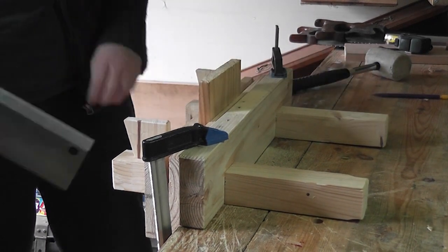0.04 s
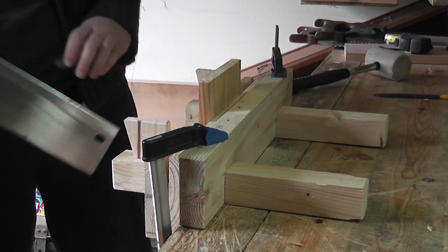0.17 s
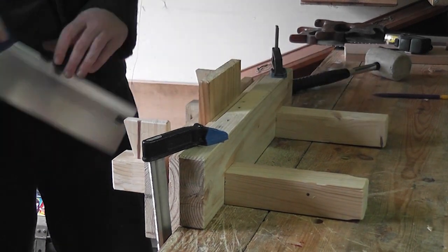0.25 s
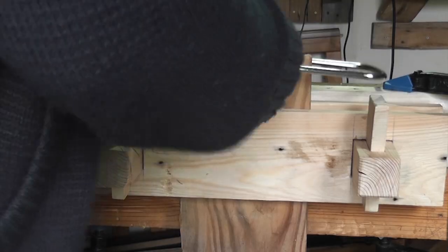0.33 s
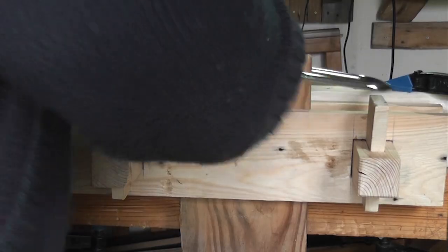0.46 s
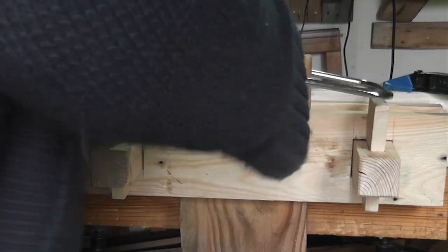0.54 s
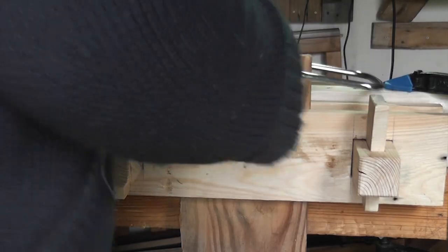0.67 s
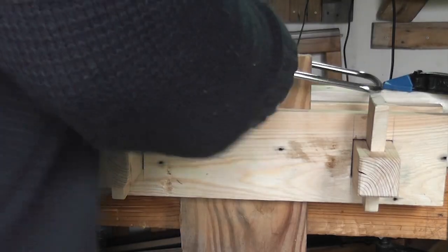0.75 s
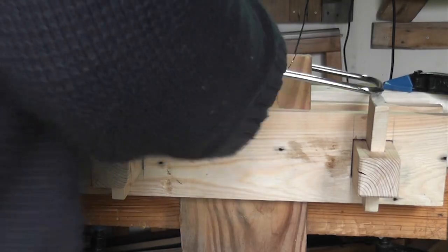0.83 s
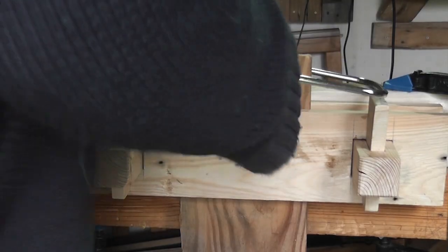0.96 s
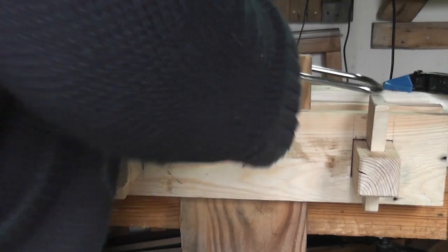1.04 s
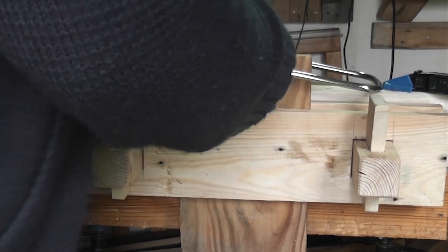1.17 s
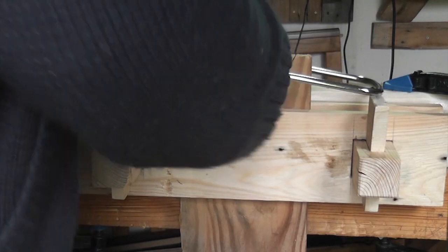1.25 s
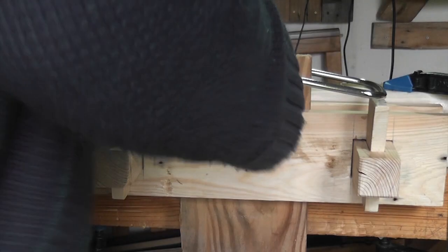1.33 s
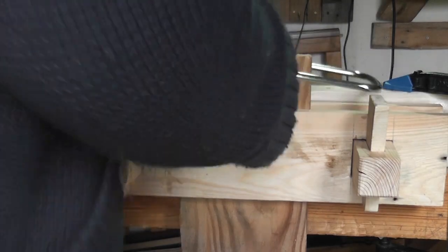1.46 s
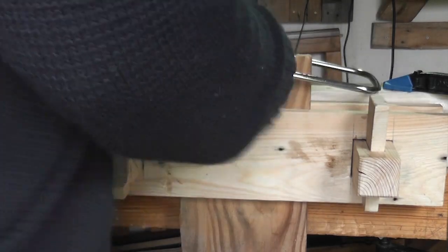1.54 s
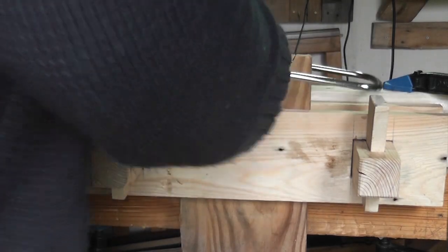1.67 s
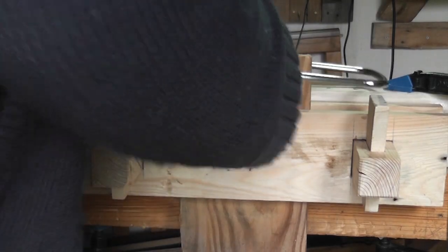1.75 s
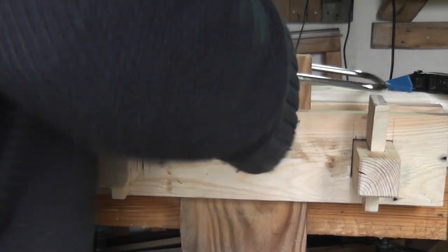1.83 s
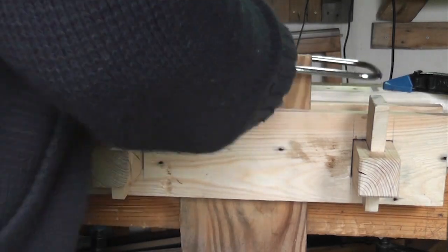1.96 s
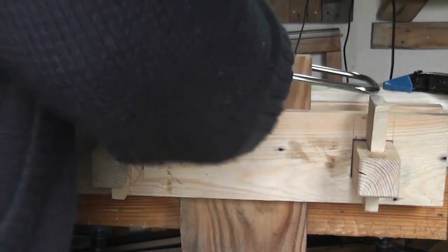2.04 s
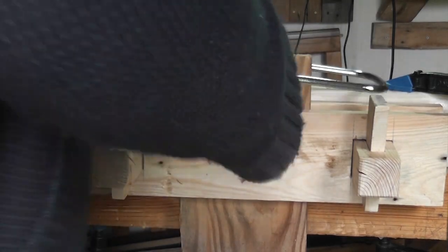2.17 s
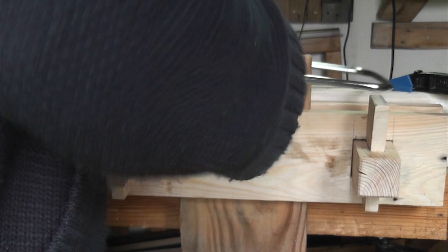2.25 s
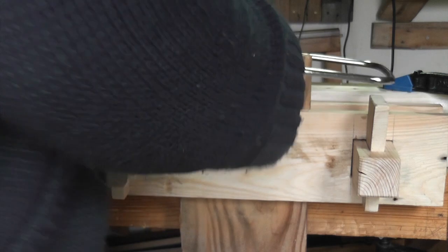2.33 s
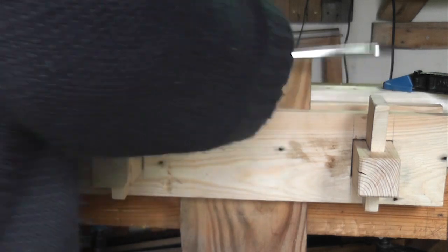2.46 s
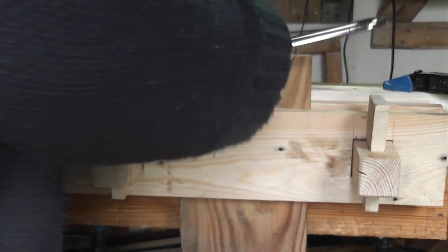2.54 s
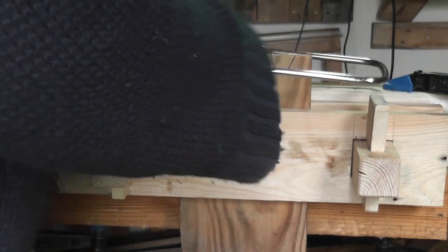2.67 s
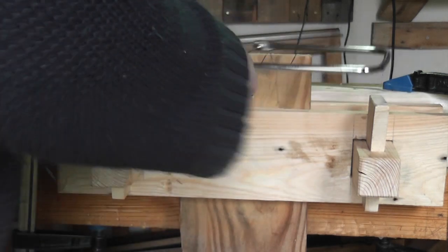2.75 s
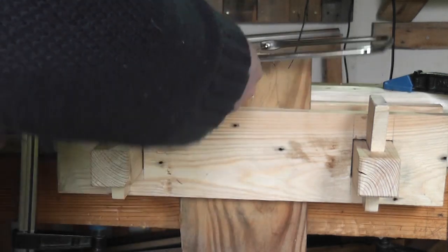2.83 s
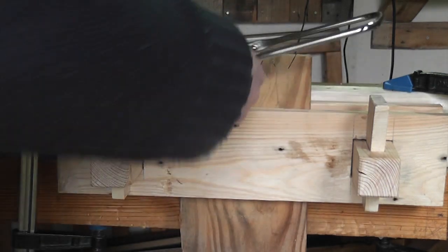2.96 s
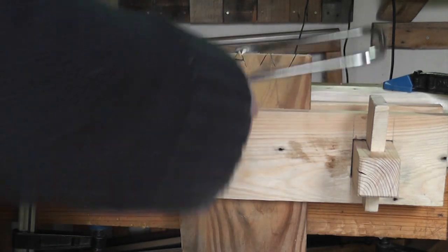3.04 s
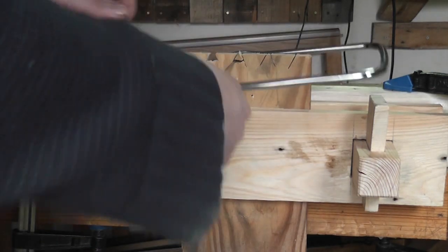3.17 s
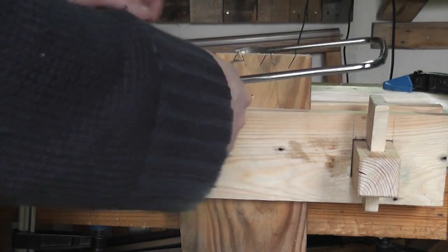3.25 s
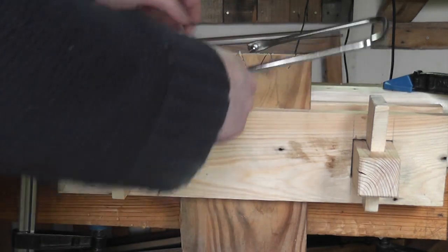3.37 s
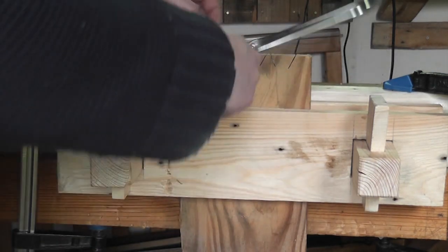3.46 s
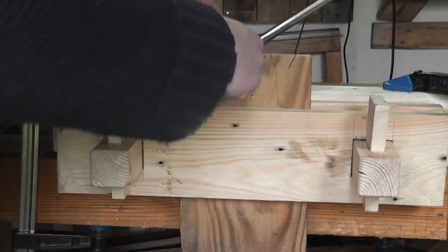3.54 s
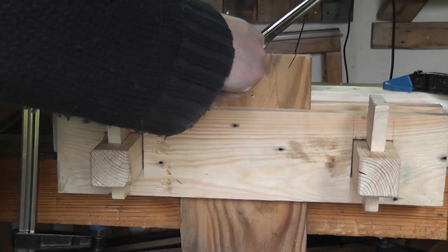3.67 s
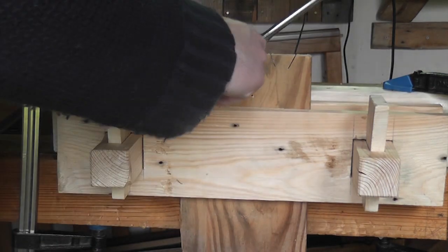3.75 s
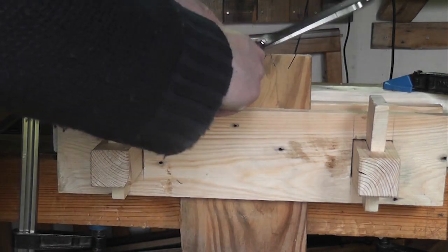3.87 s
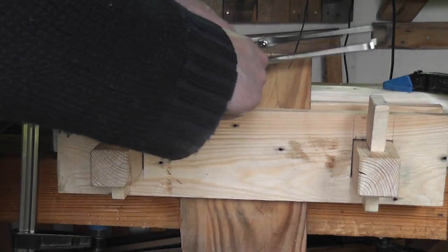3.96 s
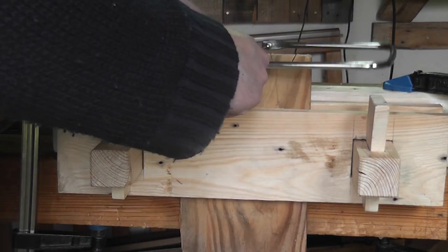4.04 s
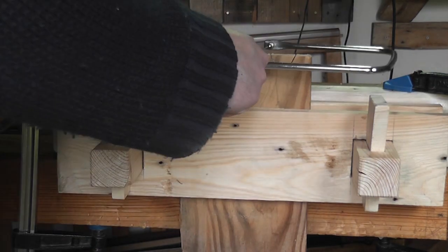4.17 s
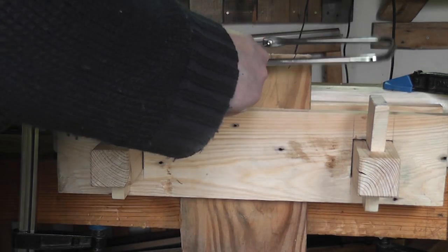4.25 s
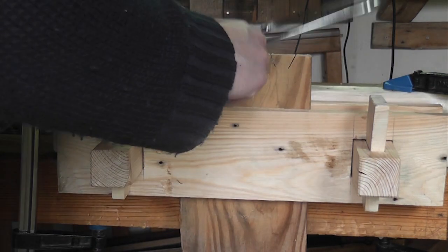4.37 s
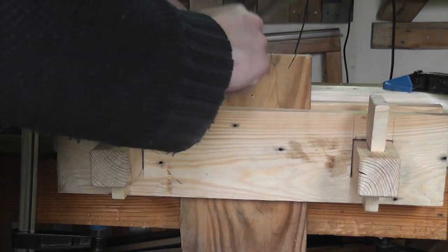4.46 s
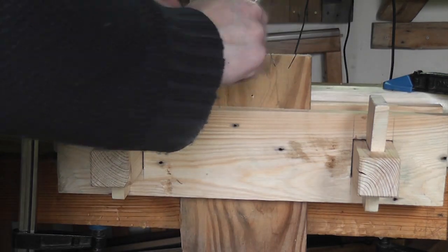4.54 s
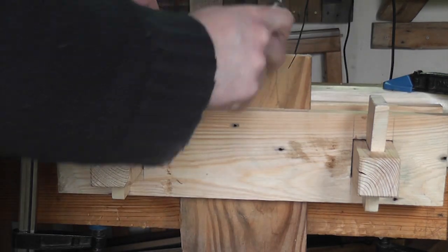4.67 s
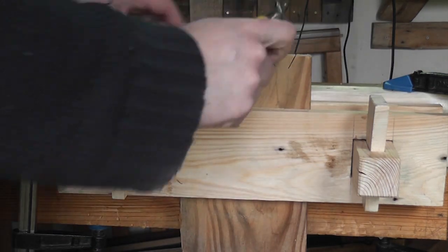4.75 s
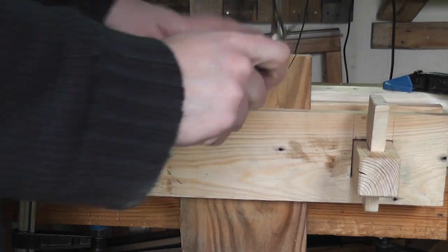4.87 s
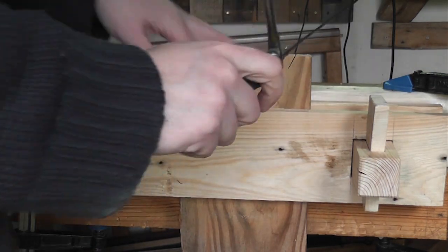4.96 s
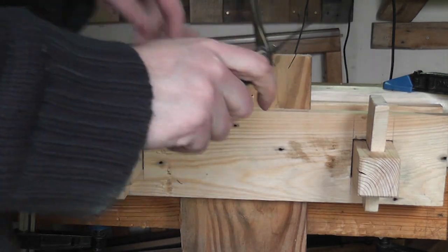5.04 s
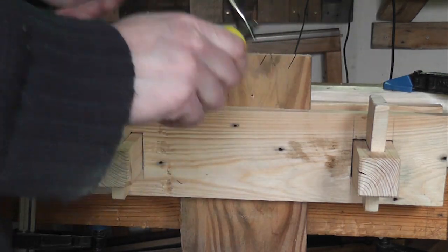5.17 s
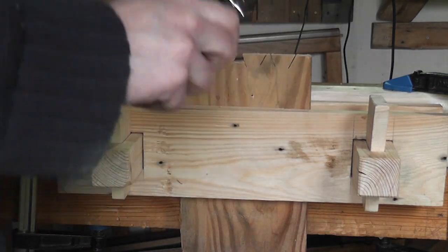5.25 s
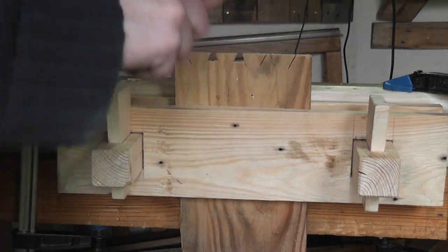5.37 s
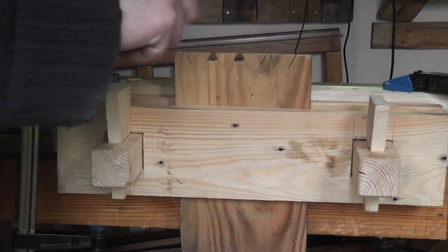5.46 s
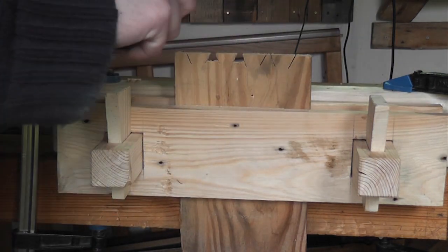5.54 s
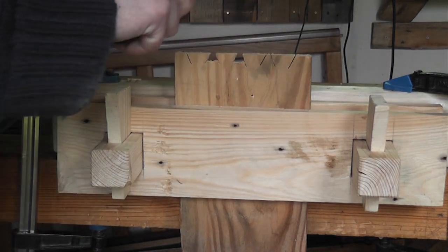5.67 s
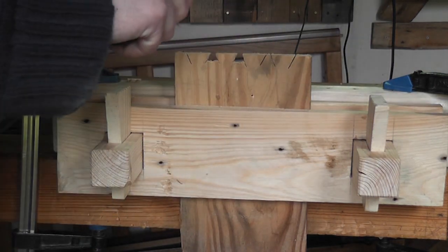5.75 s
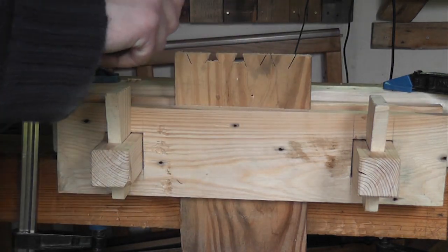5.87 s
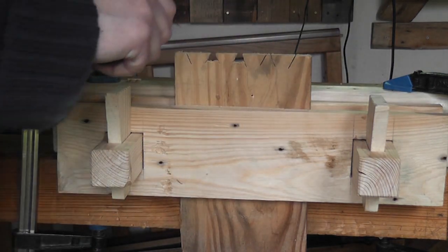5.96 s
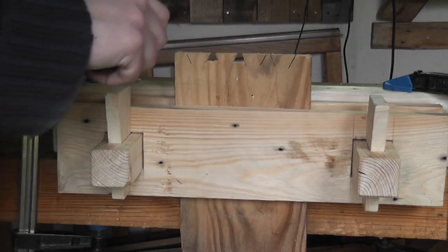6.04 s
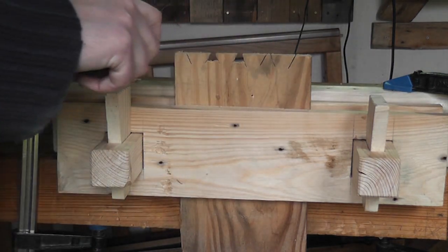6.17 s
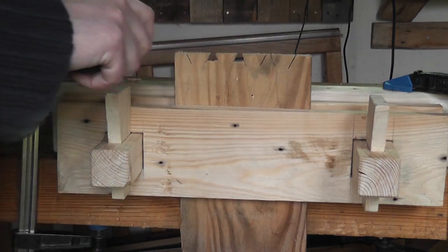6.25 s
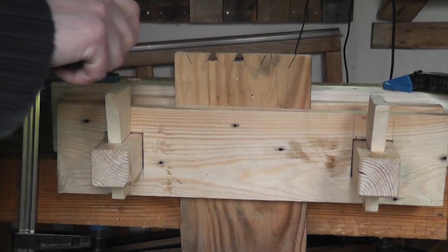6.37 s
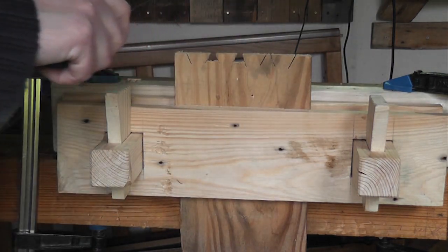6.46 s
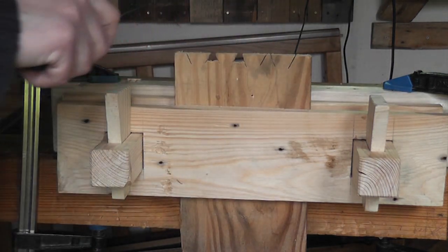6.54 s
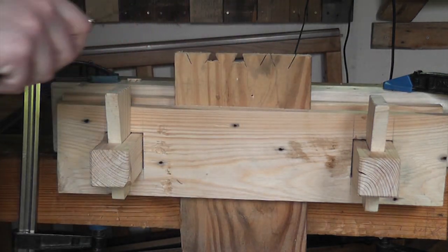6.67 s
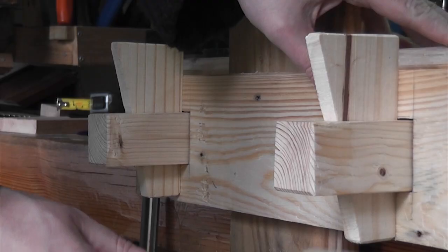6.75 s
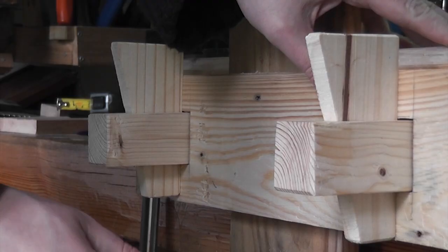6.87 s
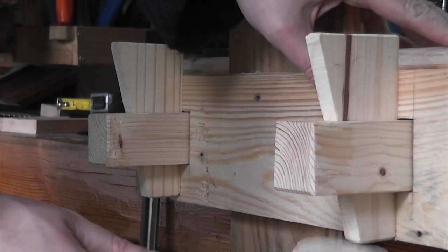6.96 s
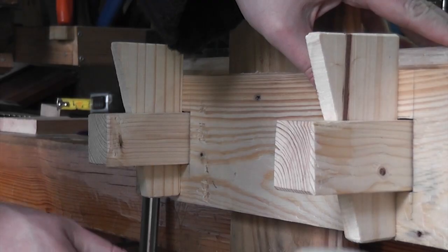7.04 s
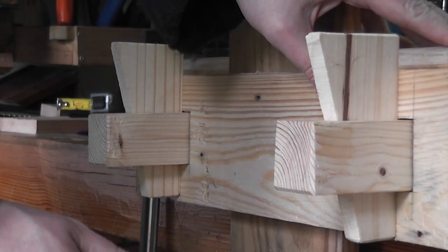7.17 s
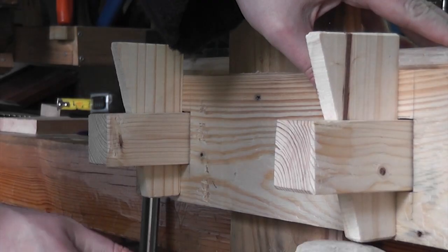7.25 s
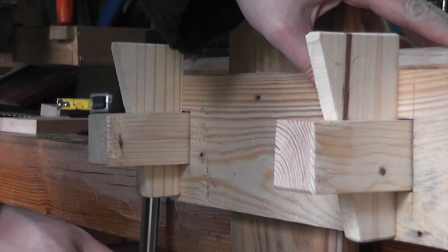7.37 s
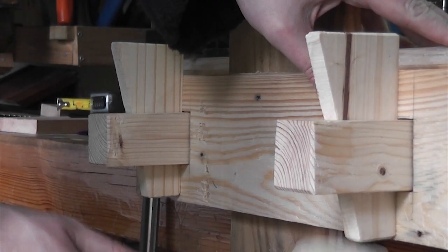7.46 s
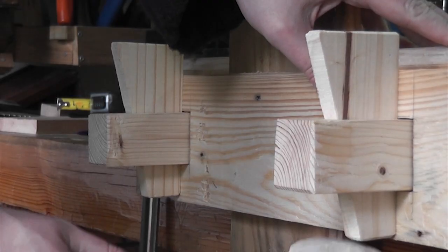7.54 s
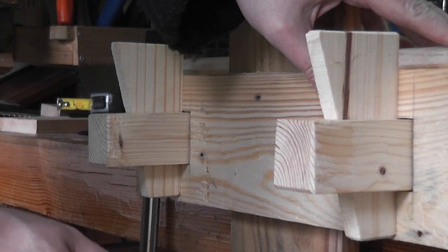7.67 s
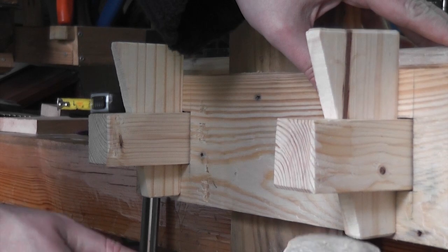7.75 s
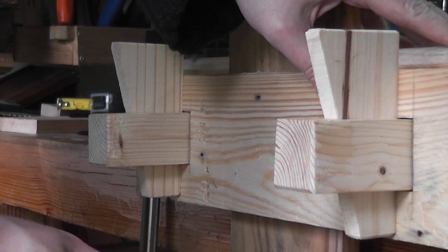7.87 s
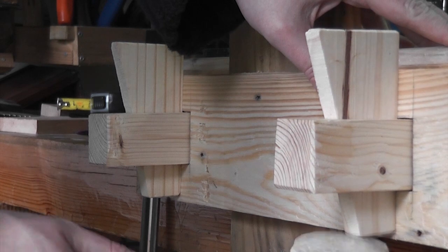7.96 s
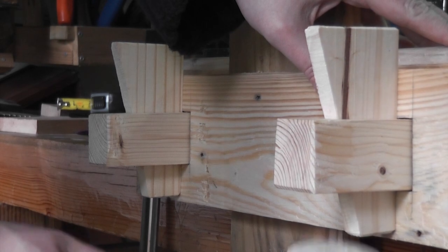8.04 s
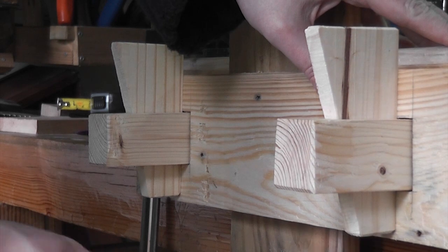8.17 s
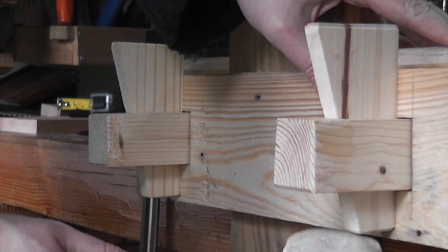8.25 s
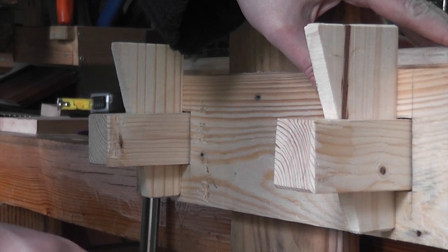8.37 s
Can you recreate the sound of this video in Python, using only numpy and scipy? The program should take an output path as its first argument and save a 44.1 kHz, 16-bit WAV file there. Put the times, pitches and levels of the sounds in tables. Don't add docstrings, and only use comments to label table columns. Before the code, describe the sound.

Close, dry sawing starts abruptly: about ten strong push-pull rasps on a resonant board, then lighter ones. The steel blade slips out, knocks wood and rubs lightly as it is eased away. Quiet room hum and distant bird whistles fill the pause. A mallet then hits a wedge seven times, a lighter setting tap followed by loud cracks with thump and bench ring. Small workshop, on-camera stereo microphone with short reflections.

```python
import sys
import numpy as np
from scipy import signal
from scipy.fft import rfft, irfft, next_fast_len
from scipy.io import wavfile
from scipy.ndimage import uniform_filter1d

SR = 44100
rng = np.random.default_rng(int(sys.argv[2]) if len(sys.argv) > 2 else 0)


def decibels_to_gain(level_db):
    exponent = np.asarray(level_db, float) / 20
    return 10 ** exponent


def generate_wav(signal):
    frames = np.transpose(np.atleast_2d(signal))
    scaled = np.clip(frames, -1, 1) * 32767
    pcm = np.round(scaled).astype(np.int16)
    wavfile.write(sys.argv[1], SR, pcm)


N = 370881

# (frequency [Hz], width [Hz], level [dB])
FRAME_MODES = [(1373, 18, -7), (2230, 51, -2.5), (2810, 55, -11), (4860, 280, -15), (5870, 98, -19)]
# (start [s], rise [s], hold [s], effort [dB], brightness [dB])
BLADE_RUBS = [(3.102, .016, 0.014, -23, 0), (3.14, 0.025, 0.018, -28.5, -3), (3.18, 0.01, 0.039, -30, -9),
              (3.3, 0.015, 0.0096, -39, 1), (3.36, 0.029, 0.036, -49, 0.5),
              (3.49, 0.072, 0.015, -33.5, 0.5), (3.62, 0.031, 0.02, -41.5, 0.5),
              (3.72, 0.03, 0.022, -45, -3), (3.885, 0.01, 0.025, -47.5, 7),
              (4.035, 0.016, 0.02, -36.5, 2.5), (4.41, 0.017, 0.018, -60.5, -21.5),
              (4.494, 0.0065, 0.023, -35, -4), (4.59, 0.016, 0.029, -68, 14), (4.79, 0.011, 0.025, -56, 7),
              (4.92, 0.037, 0.065, -42.5, -1.5), (5.0, 0.046, 0.032, -36.5, 3),
              (5.23, 0.012, 0.017, -75, 18.5), (5.35, 0.026, 0.081, -73, 16),
              (5.44, 0.0077, 0.012, -54, 1.5), (6.72, 0.022, 0.05, -58.5, 5),
              (7.012, 0.0049, 0.034, -67, 17)]


def evened(x):
    return x / np.sqrt(np.mean(x ** 2) + 1e-20)


def wander(n, size):
    return evened(uniform_filter1d(rng.standard_normal(n), size=size))


def read(points, hz):
    f, value = np.transpose(points)
    return np.interp(np.log(hz + 1), np.log(f + 1), value)


def add(mix, s, sound):
    part = mix[round(s * SR):][:len(sound)]
    part += sound[:len(part)]


def coloured(x, points, resonances=(), lift_db=0.):
    hz = np.abs(np.fft.fftfreq(8192, 1 / SR))
    gain = decibels_to_gain(read(points, hz))
    for f, width, db in resonances:
        gain = gain + decibels_to_gain(db + lift_db) / (1 + (2 * (hz - f) / width) ** 2)
    log_gain = np.log(gain + 1e-5)
    minimum_phase = np.exp(log_gain - 1j * signal.hilbert(log_gain).imag)
    taps = np.fft.ifft(minimum_phase).real[:4096]
    return signal.oaconvolve(x, taps)[:len(x)]


def patchy(x, db, size):
    z = signal.stft(x, SR, nperseg=size)[2]
    over_hz = uniform_filter1d(rng.standard_normal(z.shape), size=8, axis=0)
    patches = evened(uniform_filter1d(over_hz, size=6, axis=1))
    return signal.istft(z * decibels_to_gain(db * patches), SR, nperseg=size)[1][:len(x)]


def ring(modes, factor, seconds, rise_s):
    t = np.arange(round(seconds * SR)) / SR
    x = np.zeros(len(t))
    for f, db, t60 in modes:
        phase = 2 * np.pi * rng.random()
        x += decibels_to_gain(db - 60 * t / t60) * np.sin(2 * np.pi * f * factor * t + phase)
    x = x * (1 - np.exp(-t / rise_s))
    return x / np.abs(x).max()


def saw():
    # (frequency [Hz], density [dB per Hz])
    cut_colour = [(29, -50), (50, -54), (180, -26), (330, -15.5), (400, -12), (700, 0), (1950, -10.5),
                  (2500, -17), (3400, -16.5), (10300, -24.5), (11900, -29.5), (12300, -99), (22000, -120)]
    # (frequency [Hz], width [Hz], level [dB])
    board_modes = [(77, 15, -15.5), (187, 21, -8.5), (285, 4.3, -4.5), (398.3, 10, -5.5), (460, 71, 1.5),
                   (665, 8.1, 7), (864, 35, -23), (878, 8.3, 2.5), (1011, 20, 1), (1119, 22, 1.5),
                   (1226, 3.3, 0.5), (1366, 140, -4.5), (1575, 41, -10.5), (1804, 44, -9.5),
                   (2142, 110, -10), (2300, 170, -11.5), (2737, 170, -17.5), (4870, 85, -15.5),
                   (5520, 420, -30), (6060, 37, -25), (7380, 31, -17.5)]
    # (frequency [Hz], density [dB per Hz])
    loose_colour = [(29, -30), (50, -33), (74, -17), (149, -15), (201, 17), (248, -20), (400, -6),
                    (474, 2.5), (597, -0.5), (1380, 0), (1700, -7.5), (10600, -22), (11900, -28),
                    (12300, -73), (16600, -99), (22000, -120)]
    part_edges_hz = [350, 560, 1100, 3200, 7000]
    teeth_per_s, board_drag, full_load_db = 860, .12, -21
    parts = efforts()
    speed = teeth_per_s * (1 - board_drag * np.minimum(parts[0] / decibels_to_gain(full_load_db), 1))
    wobble = 1 + .11 * wander(N, 80)
    pace = 1 + .06 * wander(N, 3000)
    teeth = np.cumsum(speed * pace * np.abs(wobble)) / SR
    bite_db = 4.5 * np.minimum(rng.exponential(size=N), 2)
    bites = np.diff(np.floor(teeth), prepend=0) * decibels_to_gain(bite_db)
    tearing = (0.5 + np.exp(-(teeth % 1) / 1.7)) * rng.standard_normal(N)
    force = evened(bites - bites.mean()) + 1.1 * evened(tearing)
    force = force * decibels_to_gain(0.5 * wander(N, 200)) * jolts()

    bench_smooth_s = 0.12
    shake = np.sqrt(abs(uniform_filter1d(parts[0] ** 2, int(bench_smooth_s * SR))))
    gains = [decibels_to_gain(-16) * shake, *parts]
    freed = round(3.09 * SR)
    end = round((BLADE_RUBS[-1][0] + .5) * SR)
    in_cut = coloured(force[:freed], cut_colour, board_modes, 3.5)
    loose = coloured(force[freed:end], loose_colour, FRAME_MODES)
    out = np.zeros(N)
    for body, start in ((in_cut, 0), (loose, freed)):
        n = next_fast_len(len(body))
        span = slice(start, start + len(body))
        spectrum = rfft(patchy(body, 1.5, size=512), n)
        part_of = np.digitize(np.fft.rfftfreq(n, 1 / SR), part_edges_hz)
        for k, gain in enumerate(gains):
            band = irfft(spectrum * (part_of == k), n)[:len(body)]
            out[span] += gain[span] * evened(band)
    return out


def efforts():
    # (start [s], rise [s], hold
    # [s], effort [dB], brightness [dB])
    strokes = [(0.349, 0.0052, 0.029, -25, 3), (0.435, 0.035, 0.088, -23, -0.5),
               (0.655, 0.086, 0.021, -23, 3), (0.825, 0.05, 0.099, -24.5, -3), (1.082, .05, 0.023, -24, -2),
               (1.249, 0.028, 0.11, -23, 0), (1.47, 0.07, 0.037, -24, 5), (1.643, 0.031, 0.12, -23.5, -1.5),
               (1.885, 0.078, .03, -25, 5.5), (2.063, 0.032, .115, -22, -0.5),
               (2.385, 0.036, 0.036, -28.5, 3.5), (2.545, 0.025, 0.046, -45.5, 0),
               (2.612, 0.023, 0.021, -30, 3), (2.823, 0.026, 0.04, -31, 5)]
    # (rise factor [ratio], sag [dB/s], release [dB/s])
    part_shapes = [
        (1.3, 15, 189.5),
        (0.94, 22, 218),
        (0.92, 32.5, 286),
        (1.09, 43, 248),
        (0.92, 70, 243),
    ]
    cut_parts_db = [-4, -3.5, -2.5, -15, -20]
    rub_parts_db = [-12, -10, -4, -10.5, -17]
    cut_shares = [-1.05, -0.42, -0.22, 0.019, -0.35]
    rub_shares = [-0.94, -0.099, 0.29, 0.51, 1.46]
    power = np.zeros((len(part_shapes), N))
    slower, sag, release = np.transpose(part_shapes)[:, :, None]
    t = np.arange(SR // 2) / SR
    in_cut = (strokes, cut_parts_db, cut_shares)
    loose = (BLADE_RUBS, rub_parts_db, rub_shares)
    for rows, parts_db, shares in (in_cut, loose):
        for start, rise, hold, effort_db, bright_db in rows:
            rising = 19.5 * np.clip(1 - t / (rise * slower), 0, 1) ** 1.4
            falling = sag * np.clip(t - rise, 0, hold) + release * np.maximum(t - rise - hold, 0)
            db = effort_db + np.c_[parts_db] + np.c_[shares] * bright_db - rising - falling
            add(power.T, start, decibels_to_gain(2 * db).T)
    return np.sqrt(power)


def jolts():
    # (time [s], change of force [dB])
    fibre_catches = [(0.351, 6), (.4637, 3), (0.6836, 8), (0.718, 3.5), (.8438, 7), (0.868, 3), (1.087, 9),
                     (1.1122, -5), (1.1332, 1), (1.2665, 3), (1.2858, 1), (1.4943, 12), (1.654, 6),
                     (1.665, -1), (1.6919, 1), (1.7587, 6), (1.8031, 5), (1.9229, 7.5), (1.9448, 6),
                     (2.0805, -5), (2.0935, -4), (2.1362, 7.5), (2.4049, -5), (2.461, 3), (2.635, 5.5),
                     (2.654, 2), (2.693, 5), (2.8438, 3), (2.91, 8), (3.12, 4), (3.55, 5.5), (4.81, 5),
                     (4.94, 8), (5.04, 1.5), (5.091, 5), (5.065, -1), (5.11, 2), (4.971, 6), (3.525, 1),
                     (.5, 5), (.91, 2)]
    extra = np.zeros(N)
    t = np.arange(SR // 10) / SR
    for s, db in fibre_catches:
        add(extra, s, (decibels_to_gain(db) - 1) * np.exp(-t / 0.0027))
    return np.maximum(1 + extra, .1)


def sings():
    # (time [s], peak [dB], pitch [Hz], length [s])
    sung_tones = [(0.347, -23, 888, 0.041), (.46, -23.5, 830, 0.094), (0.499, -35.5, 459.7, 0.15),
                  (0.691, -29, 1438, 0.082), (0.721, -25, 458, 0.085), (0.857, -21.5, 665, 0.12),
                  (0.855, -35, 873, 0.11), (1.111, -22, 464.3, 0.082), (1.27, -23.5, 469.5, 0.087),
                  (1.278, -23.5, 656, 0.058), (1.5, -35, 498.3, 0.072), (1.692, -26, 464.5, 0.12),
                  (1.719, -22.5, 660.5, 0.081), (1.71, -38, 4870, 0.037), (2.08, -22.5, 464, 0.12),
                  (2.1, -31, 701, 0.092), (2.105, -34, 881.7, .1)]
    out = np.zeros(N)
    for s, db, pitch_hz, length in sung_tones:
        t = np.arange(round(length * SR)) / SR
        waver = wander(SR // 4, 250)[:len(t)]
        flutter = wander(SR // 4, 250)[:len(t)]
        tone = np.sin(2 * np.pi * np.cumsum(pitch_hz * (1 + 0.018 * waver)) / SR)
        add(out, s, decibels_to_gain(db + 0.5 * flutter) * tone * np.sin(np.pi * t / length))
    return out


def slither():
    # (time [s], level [dB])
    slide_level = [(.36, -57), (2.4, -65), (2.6, -48.5), (2.719, -55), (2.8, -48), (2.95, -51),
                   (2.999, -51.5), (3.08, -52), (3.28, -69), (3.38, -50), (3.65, -53.5), (3.85, -66.5),
                   (4.47, -84), (4.6, -63), (4.88, -70), (5.2, -72), (5.421, -59.5), (5.62, -87)]
    # (frequency [Hz], density [dB per Hz])
    slide_colour = [(800, -29), (2500, -6.5), (4200, -8.5), (5600, 1.5), (7500, -9), (11900, -12),
                    (12300, -87)]
    level_db = np.interp(np.arange(N) / SR, *np.transpose(slide_level), left=-120, right=-120)
    hiss = coloured(rng.standard_normal(N), slide_colour, FRAME_MODES[3:], 3.0)
    return decibels_to_gain(level_db) * evened(patchy(hiss, 2.5, size=512))


def sways():
    # (time [s], peak [dB], pitch [Hz],
    # length [s])
    soft_swells = [(0.393, -51, 77, 0.11), (0.823, -37.5, 186.2, 0.13), (2.174, -50, 77, 0.23),
                   (2.549, -48, 185.8, 0.28), (2.848, -46.5, 181.6, 0.21), (2.926, -47, 77, 0.17),
                   (3.19, -37, 78.5, 0.2), (3.551, -51, 183, 0.11), (3.75, -54, 176.1, 0.11),
                   (0.919, -45, 77, 0.26), (1.7, -49, 77, 0.27), (3.805, -48, 77, 0.22),
                   (5.007, -45, 77, 0.13), (6.862, -33, 227, 0.048),
                   (2.401, -28, 458, 0.042), (2.445, -32, 465, 0.053), (2.491, -43, 450, 0.066),
                   (2.33, -36, 930, 0.049), (2.418, -38, 1410, 0.044), (2.63, -28, 474, .05),
                   (2.63, -30.5, 700, 0.033), (2.6, -43, 2150, 0.03), (2.682, -35, 486, 0.03),
                   (2.841, -35, 693, 0.055), (2.86, -34.5, 480, .05), (3.109, -25, 1373, 0.034),
                   (3.116, -35, 458, 0.046), (3.172, -16.5, 700, 0.017), (3.185, -27, 657, 0.043),
                   (3.19, -23.5, 330, .02), (3.205, -23.5, 280, .022), (3.16, -25, 350, .018),
                   (3.2, -38, 134, .08), (3.19, -30.5, 1060, .04), (3.27, -35, 300, .06),
                   (3.19, -29, 740, .05), (3.335, -35.5, 480, 0.023), (1.662, -22, 2220, 0.015),
                   (1.688, -27.5, 1200, 0.069), (.95, -36, 404, 0.073), (6.93, -37, 225, 0.053),
                   (6.861, -34.5, 872, 0.022), (7.08, -28.5, 480, 0.041), (7.085, -30, 286, 0.04),
                   (7.318, -28, 580, 0.037), (7.347, -31.5, 410, 0.047), (7.572, -28, 660, 0.04),
                   (7.6, -32, 500, 0.048), (6.86, -43, 77, 0.23), (6.858, -32, 165, 0.017),
                   (1.1, -27, 450, 0.041), (1.135, -25, 520, .04), (4.05, -43, 480, 0.049),
                   (3.9, -38.5, 700, .05)]
    out = np.zeros(N)
    for s, db, pitch_hz, length in soft_swells:
        t = np.arange(round(length * SR)) / SR
        swell = np.sin(np.pi * (t / length) ** 0.71) ** 2
        add(out, s, decibels_to_gain(db) * np.sin(2 * np.pi * pitch_hz * t) * swell)
    return out


def hits():
    # (time [s], crack peak [dB], thump [dB rel], ring [dB rel], ring pitch [factor])
    mallet_blows = [
        (6.86, -7.5, -27, -22.5, 1.17),
        (7.0707, -4.5, -13, -12.5, 1.07),
        (7.304, -7, -5, -13.5, 0.94),
        (7.5538, -6, -5, -12.5, 0.89),
        (7.811, -7.5, -3.5, -6.5, 1.01),
        (8.063, -6, -8.5, -8, 1.03),
        (8.3312, -6.5, -7.5, -6, 0.99),
    ]
    # (time [s], tick peak [dB], thump [dB rel], ring [dB rel], bench [dB rel])
    small_knocks = [(0.8135, -38.5, -4, 12, 7.5), (2.7206, -28, -2, -17.5, -16.5),
                    (2.809, -38, -20, -30, -25), (3.114, -35, -15, -32, -22), (3.176, -13.5, 3, -7, -14),
                    (3.8943, -24, -19, -21, -30), (4.047, -28, -5, -22.5, -35), (4.4115, -63, -5, 20.5, 15),
                    (4.5008, -39, 5, -14, -8), (4.796, -42, -15, -10.5, -25), (5.09, -55, -10, -29.5, -15),
                    (5.446, -36.5, -6, -30, -37), (5.855, -44, -13, -31, -21)]
    direct, feed = np.zeros((2, N))
    contacts = [(*row, 0.65) for row in small_knocks]
    for s, crack, thump, ring_db, factor in mallet_blows:
        bench_db = -24.5 - 0.26 * ring_db
        contacts.append((s, crack, thump, ring_db, bench_db, factor, thump - 26.5))
    for s, *settings in contacts:
        near, far = blow(*settings)
        add(direct, s - .001, near)
        add(feed, s - .001, far)
    woken = rings()
    return direct + woken, feed + decibels_to_gain(-9.0) * woken


def blow(crack_db, thump_db, ring_db, bench_db, factor, bar_db=-100):
    # (frequency [Hz], density [dB per Hz])
    crack_colour = [(880, -49.5), (1500, -1.5), (4200, -2.5), (6450, -2), (7450, -5.5), (11100, -5.5),
                    (12000, -15.5), (12700, -54), (16600, -46), (22000, -120)]
    # (frequency [Hz], density [dB per Hz])
    thud_colour = [(59, -43), (100, -21), (208, -21.5), (305, -5), (422, -2), (841, -6.5), (1290, -13.5),
                   (2510, -21.5), (2960, -21), (3620, -27), (9210, -45), (12000, -65), (12700, -99),
                   (16600, -124), (22000, -120)]
    # (frequency [Hz], t60 [s])
    thud_decay = [(150, 0.27), (500, 0.26), (1200, 0.2), (3000, 0.13), (9000, 0.037)]
    # (frequency [Hz], level [dB], t60 [s])
    wedge_modes = [(360, -35, 0.11), (408, -38, 0.11), (612, -10, 0.21), (731, -12.5, 0.24),
                   (1040, -8, 0.022), (1560, 9.5, 0.0092)]
    # (frequency [Hz], level [dB], t60 [s])
    bench_modes = [(76, -13, 1.6), (110, -9, .3), (165, -6, .25), (195, -5, .22), (224, 0, .2),
                   (275, -5, .2)]
    # (frequency [Hz], level [dB], t60 [s])
    bar_modes = [(527, 0, 1.5)]
    t = np.arange(SR // 2) / SR
    click = (np.arange(2048) == round(.0018 * SR)) * 1.
    around = np.exp(-abs(t[:len(click)] - .0018) / 0.00042)
    splinters = 0.54 * rng.standard_normal(len(click)) * around
    rebound = round(0.0026 * rng.uniform(0.58, 1.2) * SR)
    landings = 1.77 * click + splinters + decibels_to_gain(-2.5) * np.roll(1.96 * click + splinters, rebound)
    padding = (0, len(t) - len(click))
    snap = np.pad(coloured(landings, crack_colour), padding)
    plain = np.pad(coloured(click, crack_colour), padding)

    chirp_hz = 3400 * rng.uniform(0.88, 1.044)
    chirp = np.sin(2 * np.pi * chirp_hz * t) * (t / 0.00044) * np.exp(-t / 0.00062)
    late = np.maximum(t - .0022, 0)
    thump = np.sin(2 * np.pi * 1300 * factor * late) * (late / 0.00044) * np.exp(-late / 0.00034)

    hz, frames, z = signal.stft(rng.standard_normal(len(t)), SR, nperseg=512)
    z = z * decibels_to_gain(read(thud_colour, hz / factor)[:, None] - 60 * frames / read(thud_decay, hz)[:, None])
    thud = signal.istft(z, SR, nperseg=512)[1][:len(t)] * (1 - np.exp(-late / 0.00079))
    wood = decibels_to_gain(-0.5) * thud / np.abs(thud).max() + decibels_to_gain(-9.0) * ring(wedge_modes, factor, .5, 0.0022)
    rattle = decibels_to_gain(4.9 * wander(len(t), 1200))
    body = decibels_to_gain(thump_db + 14.5) * thump + decibels_to_gain(ring_db + 6.0) * wood
    body = body + decibels_to_gain(bench_db - 0.5) * rattle * ring(bench_modes, 1, .5, 0.0033)
    body = body + decibels_to_gain(bar_db) * ring(bar_modes, 1, .5, 0.0019)

    peak = np.abs(snap).max()
    spread = plain * np.linalg.norm(snap) / np.linalg.norm(plain)
    near = 0.55 * chirp + snap / peak + body
    far = decibels_to_gain(-5.5 - 0.31 * ring_db) * spread / peak + body
    fade = signal.windows.tukey(2 * len(t), .3)[len(t):]
    return decibels_to_gain(crack_db) * np.array([near, far]) * fade


def rings():
    # (time [s], peak [dB], pitch [Hz], t60 [s])
    woken_modes = [(3.113, -20, 2230, 0.081), (3.112, -23, 5950, 0.066), (3.315, -31, 1373, 0.054),
                   (4.415, -44, 412, 0.34), (4.418, -47, 576, 0.35), (4.5, -33.5, 2300, 0.034),
                   (4.502, -33, 3320, 0.039), (4.507, -30.5, 5200, 0.026), (3.112, -39, 458, 0.44),
                   (3.18, -27, 500, 0.32), (3.19, -33, 282.4, 0.32), (3.19, -27.5, 202.6, 0.47),
                   (7.072, -12.5, 1450, 0.013), (7.073, -23, 533, 0.15), (7.304, -14, 1400, 0.013),
                   (7.306, -24, 454, 0.31), (7.306, -25.5, 285, 0.15), (7.556, -25, 455, 0.13),
                   (7.557, -15, 966, 0.049), (7.557, -26, 2895, 0.13), (5.08, -35, 5840, 0.058),
                   (5.086, -39, 3790, .06), (4.43, -40, 342, 0.18), (6.862, -32, 663, .15),
                   (7.812, -20.5, 509.4, 0.28), (7.812, -19.5, 834, 0.25), (8.065, -18, 398, 0.18),
                   (8.065, -12.5, 655, 0.092), (8.333, -20, 420, 0.37), (8.333, -20.5, 706, 0.6)]
    out = np.zeros(N)
    for s, db, pitch_hz, t60 in woken_modes:
        pair = [(pitch_hz, 0, t60), (1.07 * pitch_hz, -6, t60)]
        add(out, s, decibels_to_gain(db) * ring(pair, 0.99, .4, 1.3 / pitch_hz))
    return out


def birds():
    # (time [s], peak [dB], pitch [Hz], length [s])
    whistles = [(3.3494, -45, 5000, 0.08), (3.482, -49, 5583, 0.075), (3.6494, -41, 4870, 0.047),
                (4.17, -48, 4660, 0.058), (4.228, -51, 4720, 0.095), (4.3, -54, 5400, 0.036),
                (4.32, -48, 4850, 0.046), (4.427, -48, 5000, 0.039), (4.619, -45.5, 4520, 0.044),
                (4.72, -49, 4730, 0.055), (4.79, -52, 4850, 0.053), (4.906, -49, 4580, 0.036),
                (5.171, -51, 4630, 0.071), (5.238, -57, 4960, 0.075), (5.293, -53, 4580, 0.05),
                (5.49, -51.5, 5060, 0.044), (5.595, -51, 4700, 0.04), (5.678, -61, 4600, 0.053),
                (5.76, -60, 4600, 0.06), (5.905, -51, 4380, 0.027), (6.068, -50, 4470, 0.044),
                (6.119, -56, 4500, 0.057), (6.23, -53, 4700, 0.082), (6.308, -57, 4710, 0.052),
                (6.4694, -56, 4540, 0.082), (6.558, -58, 4460, 0.075), (6.707, -55, 4450, 0.023)]
    out = np.zeros(N)
    for s, db, pitch_hz, length in whistles:
        t = np.arange(round(1.67 * max(length, .02) * SR)) / SR
        waver = wander(SR // 4, 150)[:len(t)]
        flutter = wander(SR // 4, 150)[:len(t)]
        tone = np.sin(2 * np.pi * np.cumsum(pitch_hz * (1 + .013 * waver)) / SR)
        tone = tone * decibels_to_gain(np.clip(4.5 * flutter, -12, 6))
        add(out, s, decibels_to_gain(db - 8.5) * tone * signal.windows.tukey(len(t), .6))
    return out


def hum():
    # (frequency [Hz], density [dB per Hz])
    air_colour = [(12, -28), (20, -25), (64, 2), (174, -4.5), (253, -7.5), (298, -1), (810, -4.5),
                  (1090, -3.5), (1210, -7), (4440, -16), (5080, -20), (11800, -31), (12200, -62),
                  (16600, -66), (22000, -120)]
    # (frequency [Hz], width [Hz], level [dB])
    fan_modes = [(86.4, 18, 7), (187, 41, 5.5), (1060, 5.8, 12), (2160, 410, -12)]
    # (time [s], level [dB])
    air_level = [(0, -43.5), (0.332, -41), (.37, -35.5), (3.8, -40.5), (6.7, -42.5), (6.802, -41),
                 (8.41, -48)]
    # (frequency [Hz], side minus mid [dB])
    air_side = [(30, 4), (80, -18.5), (250, -5.5), (640, -7.5), (1150, -10), (2080, -12), (3300, -51),
                (12300, -32)]
    mid = coloured(rng.standard_normal(N), air_colour, fan_modes, -5.0)
    side = coloured(rng.standard_normal(N), air_colour, fan_modes, -5.0)
    mid = patchy(mid, 1.6, size=1024)
    level_db = np.interp(np.arange(N) / SR, *np.transpose(air_level))
    gain = decibels_to_gain(level_db - 9.5) / np.std(mid)
    return gain * mid, gain * coloured(side, air_side)


def echoes(x):
    # (frequency [Hz], t60 [s])
    shop_decay = [(80, 0.43), (300, 0.25), (1100, 0.26), (3000, 0.3), (8000, 0.19)]
    taps = np.zeros(SR // 2)
    at = np.arange(200, len(taps) - 16, 16)
    taps[at + rng.integers(0, 16, len(at))] = rng.choice([-1., 1.], len(at))
    hz, t, z = signal.stft(taps, SR, nperseg=256)
    z = z * (hz > 0)[:, None] * decibels_to_gain(-60 * t / read(shop_decay, hz)[:, None])
    tail = signal.istft(z, SR, nperseg=256)[1]
    return signal.oaconvolve(x, tail / np.linalg.norm(tail))[:N]


def scene():
    # (frequency [Hz], side minus mid [dB])
    echo_side = [(30, -32), (80, -44), (150, -25), (300, -6), (640, 1), (1150, 1.5), (2080, 2.5),
                 (3300, -36), (8000, -40), (12300, -4)]
    # (frequency [Hz], level [dB])
    port_bass = [(30, -3), (80, -7), (150, -7), (300, -30), (1000, -60)]
    cutting = saw() + sings() + slither() + sways()
    struck, struck_feed = hits()
    song = birds()
    hum_mid, hum_side = hum()
    sent = decibels_to_gain(-5.0) * cutting + decibels_to_gain(-5.5) * struck_feed + decibels_to_gain(-9) * song
    near = decibels_to_gain(2.5) * cutting + struck
    mid = near + decibels_to_gain(-1.5) * song + echoes(sent) + hum_mid
    side = decibels_to_gain(-8.5) * coloured(echoes(sent), echo_side) + hum_side
    side = side + coloured(echoes(near), port_bass)
    return np.array([mid + side, mid - side])


def band_limit(x):
    return signal.sosfilt(signal.butter(12, 12890, fs=SR, output="sos"), x)


def record(dry):
    # (frequency [Hz], left minus right [dB])
    left_more = [(60, -1), (250, -.2), (600, -.9), (2200, -.8), (3400, 0)]
    # (frequency [Hz], width [Hz], depth [0-1])
    port_notch = (2417, 104, 0.59)
    hz = np.fft.rfftfreq(N, 1 / SR)
    tilt = decibels_to_gain(read(left_more, hz) / 2)
    low_cut = 1j * hz / (1j * hz + 42)
    notch_hz, width, depth = port_notch
    notch = 1 - depth / (1 + 2j * (hz - notch_hz) / width)
    ports = irfft(rfft(dry) * low_cut * notch * np.array([tilt, 1 / tilt]), N)
    return band_limit(np.tanh(ports))


dry = scene()
out = record(dry)
generate_wav(out)
```